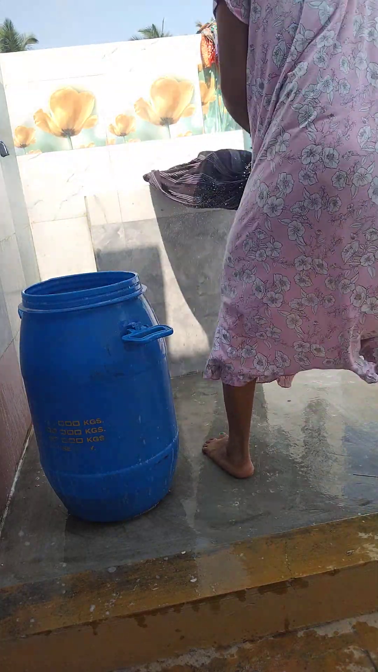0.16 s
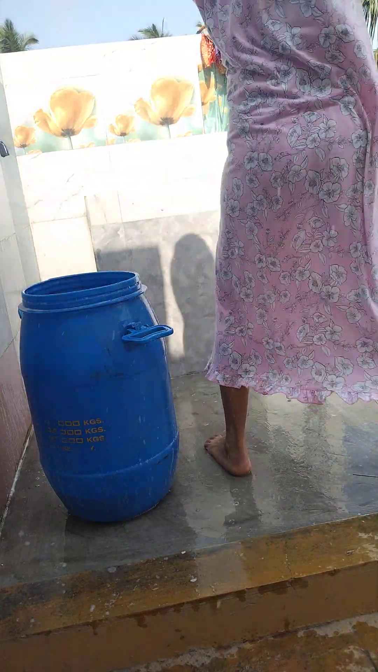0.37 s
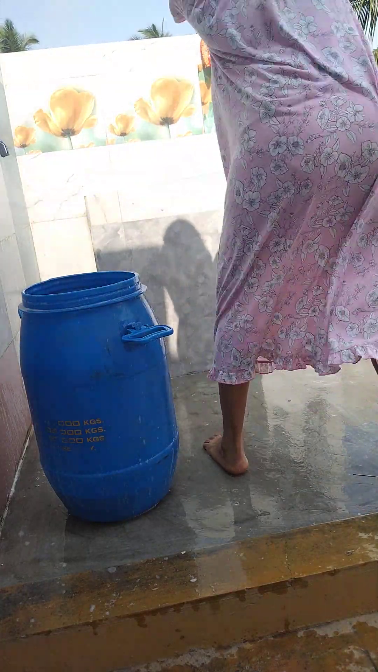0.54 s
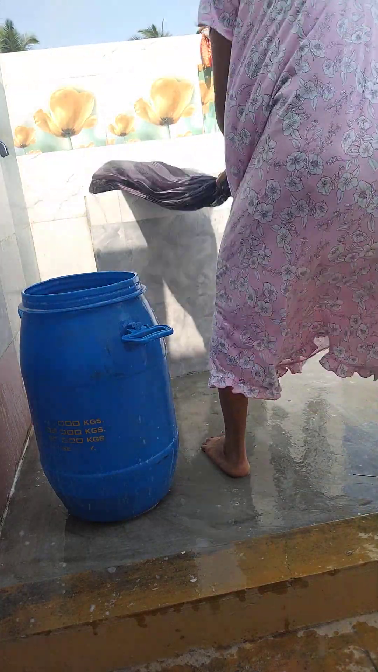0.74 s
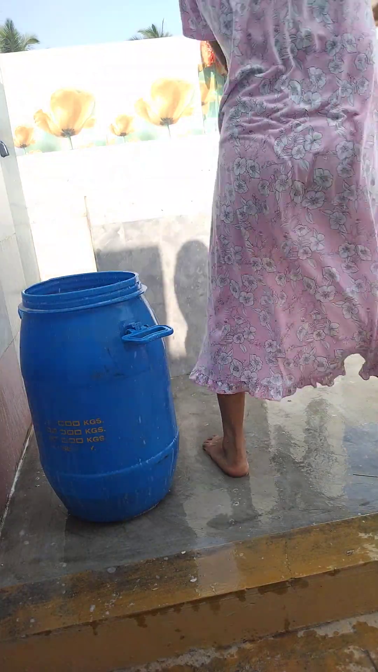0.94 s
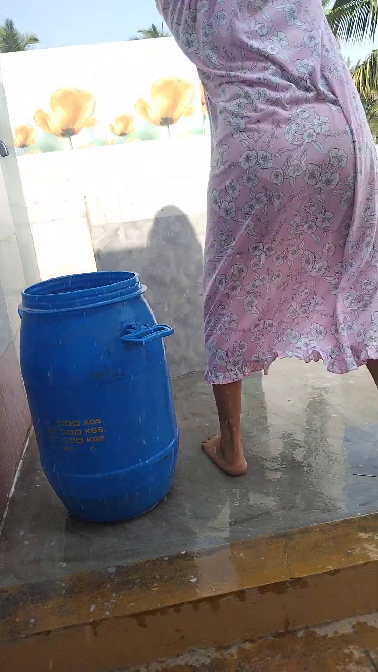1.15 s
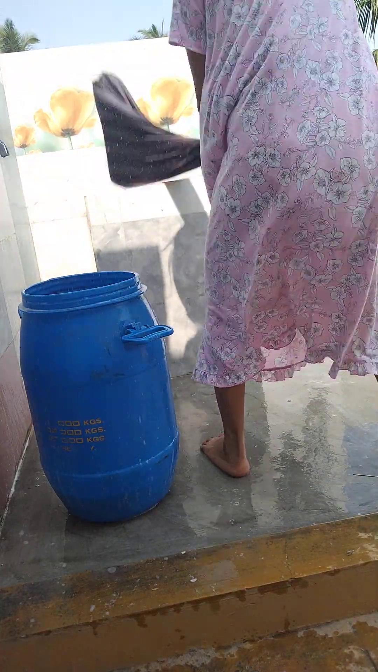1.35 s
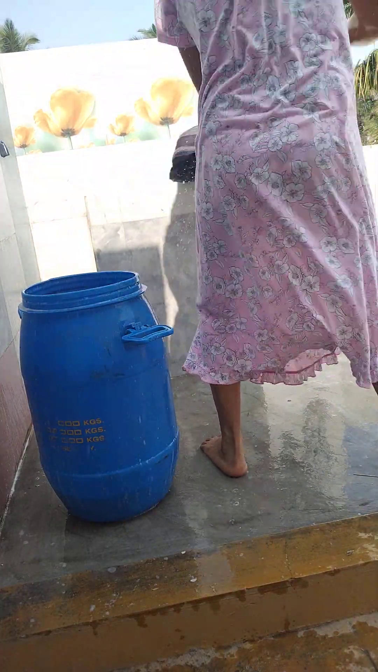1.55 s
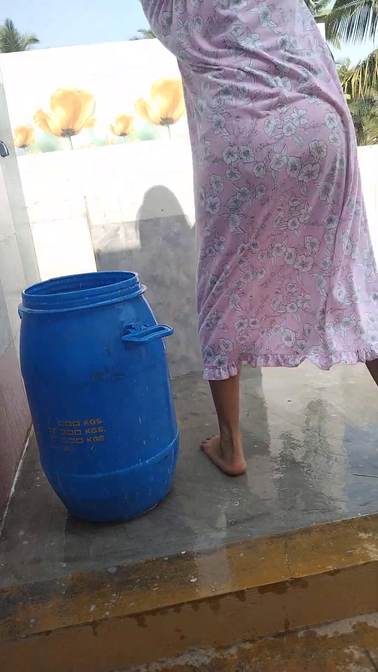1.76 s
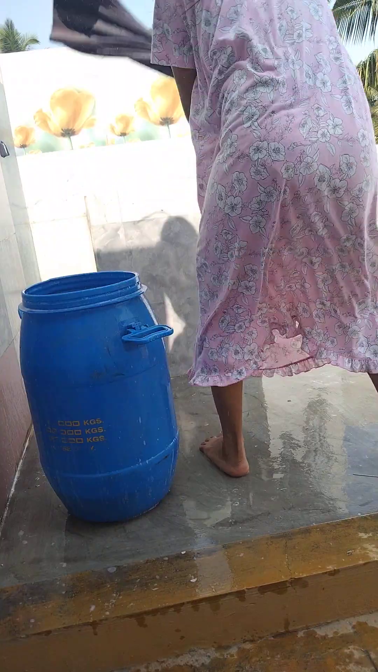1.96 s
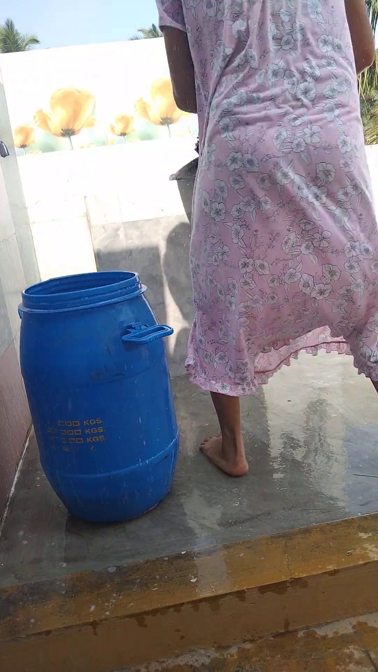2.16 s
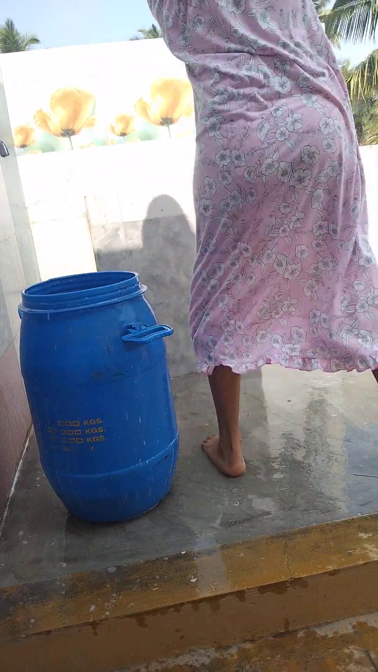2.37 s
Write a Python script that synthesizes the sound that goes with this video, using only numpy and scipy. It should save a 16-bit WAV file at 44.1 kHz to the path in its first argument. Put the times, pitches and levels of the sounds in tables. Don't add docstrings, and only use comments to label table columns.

```python
import sys
import numpy as np
from scipy import signal
from scipy.fft import rfft, irfft
from scipy.io import wavfile
from scipy.ndimage import uniform_filter1d, map_coordinates

SR = 44100
rng = np.random.default_rng(int(sys.argv[2]) if len(sys.argv) > 2 else 0)


def nominal_scale(level):
    x = np.asarray(level, float) / 20
    return 10 ** x


def materialize(psi):
    bounded = np.clip(np.atleast_2d(psi).T, -1, 1)
    quanta = np.round(bounded * 32767).astype(np.int16)
    wavfile.write(sys.argv[1], SR, quanta)


N = 110250


def unit(x):
    return x / np.sqrt(np.mean(x ** 2) + 1e-20)


def along(points, hz):
    point_hz, value = np.transpose(points)
    return np.interp(np.log(hz + 1), np.log(point_hz + 1), value)


def wobble(rate, size=N):
    knots = rng.standard_normal(int(size * rate / SR) + 4)
    return map_coordinates(knots, [np.arange(size) * rate / SR])


def noise(response, size=N):
    hz = np.fft.rfftfreq(size, 1 / SR)
    spectrum = rfft(rng.standard_normal(size))
    return unit(irfft(spectrum * response(hz), size))


def coloured(points):
    return lambda hz: nominal_scale(along(points, hz))


def hump(centre_hz, width):
    return lambda hz: np.exp(-(np.log((hz + 1) / centre_hz) / width) ** 2)


def add(track, s, sound):
    part = track[round(s * SR):][:len(sound)]
    part += sound[:len(part)]


def sine(hz, t, phase=0):
    return np.sin(2 * np.pi * hz * t + phase)


def gate(t, start_s, length_s):
    return np.clip(np.minimum(t - start_s + 0.0035, start_s + length_s - t) / 0.012, 0, 1)


# frequency in Hz, density in dB per Hz.
HUM_COLOUR = [(25, -40), (65, -11.5), (134, 12.5), (211, -6.5), (284, -39.5), (500, -19.5), (650, -41),
              (1100, -120)]


def hum():
    level_db = -53.5 + 2.3 * wobble(6.1)
    return nominal_scale(level_db) * noise(coloured(HUM_COLOUR))


# frequency in Hz, density in dB per Hz.
HISS_COLOUR = [(1500, -36.5), (3200, -9.5), (4100, 2), (5500, -1.5), (8000, -6.5), (11000, -10),
               (15500, -5), (16500, -30)]


def hiss():
    level_db = -73 + 1.1 * wobble(24) + 2.7 * wobble(85)
    return nominal_scale(level_db) * noise(coloured(HISS_COLOUR))


# time in seconds, level in dB.
DRAG_LEVEL = [(0, -59.5), (.125, -77.5), (.4, -53), (.58, -61.5), (.66, -84.5), (.8, -79), (.86, -58),
              (1.05, -45.5), (1.25, -63), (1.38, -65.5), (1.64, -54), (1.88, -53.5), (2.08, -57.5),
              (2.3, -48), (2.5, -49)]
# frequency in Hz, density in dB per Hz.
RUSTLE_COLOUR = [(120, -20), (200, -9), (306, -6), (434, -3), (784, -11), (1340, -10), (7740, -34.5),
                 (14800, -54.5)]


def dragging():
    t = np.arange(N) / SR
    level_db = np.interp(t, *np.transpose(DRAG_LEVEL)) + 3 + 0.5 * wobble(20.0)
    return nominal_scale(level_db) * noise(coloured(RUSTLE_COLOUR))


# start in seconds, centre in Hz, length in seconds, width share.
DRONE_BANDS = [(0, 1310, .15, .05), (.69, 1280, .05, .03), (.68, 410, .17, .28), (.66, 4100, .19, .03),
               (1.35, 1450, .06, .04), (1.40, 930, .05, .05), (1.40, 2250, .03, .04), (.805, 870, .04, .08),
               (.812, 1780, .025, .04), (.805, 2400, .02, .04), (.82, 1370, .03, .05)]
DRONE_LEVELS = [-67, -72, -56, -84, -62, -59.5, -59, -57.5, -74, -74, -60]


def drones():
    t, out = np.arange(N) / SR, np.zeros(N)
    for (s, hz, length_s, width), db in zip(DRONE_BANDS, DRONE_LEVELS):
        out += nominal_scale(db) * gate(t, s, length_s) * noise(hump(hz, width))
    return out


def puffs(rows, width, trim_db, rustle_db):
    out, t = np.zeros(N), np.arange(SR // 4) / SR
    for s, db, hz, length_s in rows:
        burst = noise(hump(hz, width), size=len(t))
        rustle = noise(coloured(RUSTLE_COLOUR), size=len(t))
        envelope = np.minimum(t / 0.0023, 1) * np.exp(-t / length_s)
        add(out, s - .002, nominal_scale(db + trim_db) * envelope * (burst + nominal_scale(rustle_db) * rustle))
    return out


# time in seconds, peak in dB, centre in Hz, length in seconds.
FLOP_EVENTS = [(0.137, -48, 700, 0.02), (0.146, -37.5, 514, 0.072), (0.808, -50, 473, 0.04),
               (1.166, -43, 930, 0.037), (1.257, -42.5, 283, 0.049), (1.403, -43.5, 426, 0.07),
               (1.845, -35, 436, 0.016), (2.018, -41, 440, 0.081), (2.05, -49, 494, 0.082)]


def flops():
    return puffs(FLOP_EVENTS, width=0.36, trim_db=-6, rustle_db=-4.5)


def swelling_tones(rows, trim_db):
    out, t = np.zeros(N), np.arange(SR // 5) / SR
    for s, db, hz, rise_s in rows:
        u = t / rise_s
        tone = sine(hz, t, 6 * rng.random() + 0.22 * wobble(90, size=len(t)))
        add(out, s, nominal_scale(db + trim_db) * np.e * u * np.exp(-u) * tone)
    return out


# time in seconds, level in dB, pitch in Hz, rise in seconds.
HOLLOW_ANSWERS = [(.232, -20.5, 120, 0.0092), (.246, -18, 490, .008), (.285, -28, 548, 0.018),
                  (0.284, -30, 340, 0.027), (0.41, -37, 510, .012), (.144, -39.5, 470, 0.0031),
                  (1.167, -44.5, 930, .003), (0.69, -51, 480, .005), (.94, -27, 215, 0.011),
                  (1.256, -43.5, 750, 0.0026)]


def answers():
    return swelling_tones(HOLLOW_ANSWERS, trim_db=0)


# time in seconds, peak in dB, centre in Hz, length in seconds.
DRIP_EVENTS = [(0.467, -47, 8450, 0.0048), (0.503, -52.5, 7830, 0.007), (0.657, -53.5, 7910, 0.0057),
               (0.657, -59.5, 12500, 0.008), (0.394, -48, 7600, 0.008), (0.502, -54, 12430, 0.01),
               (1.357, -57.5, 3990, 0.0051), (1.8, -42.5, 2540, 0.014), (1.848, -42, 2600, 0.01),
               (0.147, -47, 3300, 0.011), (1.167, -46, 4600, 0.0091), (1.801, -48.5, 7000, 0.0078),
               (1.964, -46.5, 3860, 0.018), (1.9923, -38, 5800, 0.0054)]


def drips():
    return puffs(DRIP_EVENTS, width=0.3, trim_db=-8, rustle_db=-4.5)


def wet_contact(t, contact_s, attack_s, colour):
    press = np.minimum(t / attack_s, 1) ** 2 * np.exp(-np.maximum(t - contact_s, 0) / 0.017)
    body = noise(coloured(colour), size=len(t)) * nominal_scale(3 * wobble(235.6, size=len(t)))
    split_hz = 1180
    bass = signal.sosfilt(signal.butter(2, split_hz, fs=SR, output="sos"), body)
    treble = signal.sosfilt(signal.butter(2, split_hz, "high", fs=SR, output="sos"), body)
    sizzle = np.minimum(1.5 * t / attack_s, 1) * np.exp(-t / 0.018)
    return nominal_scale(-6) * press * bass + 3.2 * sizzle * treble


def slab_ring(t, modes):
    out = np.zeros(len(t))
    for hz, level_db, t60_s in modes:
        phase = 6 * rng.random() + 0.87 * wobble(70, size=len(t))
        out += nominal_scale(level_db - 60 * t / min(t60_s, 0.22)) * sine(hz, t, phase)
    return np.minimum(t / 0.019, 1) * out


# frequency in Hz, time to fall 60 dB in seconds.
YARD_T60 = [(100, 0.9), (500, 0.43), (2000, 0.63), (8000, 0.33), (16000, 0.96)]
# frequency in Hz, density in dB per Hz.
WALL_COLOUR = [(35, -76.5), (60, -28.5), (161, -18), (199, -19), (546, -14.5), (586, -14), (7960, -43.5),
               (15000, -70)]


def yard(t, far_db):
    hz, u, z = signal.stft(noise(coloured(WALL_COLOUR), size=len(t)), SR, nperseg=256)
    swell_db = far_db * np.exp(-((u - 0.11) / 0.055) ** 2) / (1 + hz[:, None] / 5000)
    decay_db = 60 * u / along(YARD_T60, hz)[:, None]
    tail = signal.istft(z * nominal_scale(swell_db - decay_db), SR, nperseg=256)[1][:len(t)]
    splashes = nominal_scale(1.3 * wobble(160, size=len(t)))
    return tail * np.minimum(t / 0.0096, 1) * splashes


def barrel(t, hold_s):
    envelope = np.minimum(t / 0.013, 1) * np.exp(-(np.maximum(t - hold_s, 0) / 0.105) ** 2)
    return envelope * sine(165, t, 0.054 * wobble(42, size=len(t)))


def trough(t, level_db):
    envelope = np.minimum(t / 0.01, 1) * nominal_scale(level_db - 60 * t / 0.56)
    return envelope * sine(122, t, 0.5 * wobble(24, size=len(t)))


SLAP_TIMES = [.2050, .8478, 1.4772, 2.1182]
# peak in dB, contact in seconds, attack in seconds, yard level in dB, far wall swell in dB.
SLAP_BLOWS = [
    (-0.5, 0.034, 0.0053, -7.5, 4.5),
    (-6, 0.0075, 0.01, -3.5, 8),
    (-8.5, 0.049, 0.011, -1, 3.5),
    (-4, 0.024, 0.013, -4, 4.5),
]
# frequency in Hz, density in dB per Hz.
WET_COLOURS = [
    [(35, -58), (60, -14.5), (559, 0.5), (1080, -34), (1330, -11.5), (1900, -26.5), (2040, -19.5),
     (14700, -55)],
    [(35, -54), (60, -44), (224, 0.5), (834, -6), (1010, -13), (1210, -8), (4030, -31), (15000, -61)],
    [(35, -43), (60, -5), (691, -3), (834, 14), (1010, -5), (2140, -4), (2350, -5.5), (14700, -36)],
    [(35, -43), (60, -21), (432, 10), (834, 4.5), (1060, -4), (1370, -2), (2770, -12), (15000, -42.5)],
]
# frequency in Hz, level in dB, time to fall 60 dB in seconds.
SLAB_MODES = [
    [(255.3, 5, .3), (526, 8, 0.15), (845, 4.5, 0.2), (1293, -10, 0.082), (2050, -7, 0.068)],
    [(239, 4, 0.28), (618, 1.5, 0.29), (1250, 4, 0.13)],
    [(609, 1, 0.21), (840, 1, 0.13), (1330, 5, 0.24), (2160, -3, 0.082)],
    [(444, -2, 0.12), (817, -0.5, 0.15), (1390, -6, 0.065)],
]
SLAB_LEVELS = [2.5, 0.5, 1.5, -2.5]
# level over the slap in dB, time from the blow until it starts to fade in
# seconds.
BARREL_BOOMS = [
    (-20.5, 0.028),
    (-18, 0.1),
    (-1, 0.048),
    (-10.5, 0.083),
]
TROUGH_LEVELS = [-16, -18.5, -19, -39]


def slaps():
    out, t = np.zeros(N), np.arange(SR) / SR
    rows = zip(SLAP_TIMES, SLAP_BLOWS, WET_COLOURS, SLAB_MODES, SLAB_LEVELS, BARREL_BOOMS, TROUGH_LEVELS)
    for s, blow, colour, modes, ring_db, (barrel_db, hold_s), trough_db in rows:
        peak_db, contact_s, attack_s, yard_db, far_db = blow
        sound = wet_contact(t, contact_s, attack_s, colour)
        sound += nominal_scale(ring_db - 6) * slab_ring(t, modes)
        sound += nominal_scale(yard_db) * yard(t, far_db)
        sound += nominal_scale(barrel_db) * barrel(t, hold_s)
        sound += 2 * trough(t, trough_db)
        add(out, s, nominal_scale(peak_db - 12.5) * sound)
    return out


FOLD_TIMES = [.2056, .2100, .2138, .8561, 1.4800, 1.4853, 2.1218, 2.1256]
# pop level in dB, pop length in seconds, spray level in dB.
FOLD_POPS = [(-24.5, 0.0002, -24), (-7.5, 0.00029, -24), (-5.5, 0.0004, -27.5), (-3, 0.00013, -29.5),
             (-30, 0.00012, -22), (-7.5, 0.00035, -30), (-27, 0.00017, -29.5), (-13, 0.00035, -30)]


def folds():
    out, t = np.zeros(N), np.arange(SR // 10) / SR

    def spray_colour(hz):
        return 1 / (1 + (2790 / (hz + 1)) ** 4) / (1 + hz / 6000)

    for s, (pop_db, pop_s, spray_db) in zip(FOLD_TIMES, FOLD_POPS):
        u = t / pop_s
        pop = 1.3 * u ** 2 * (3 - u) * np.exp(-u)
        spray = noise(spray_colour, size=len(t)) * np.exp(-t / 0.0024)
        add(out, s, nominal_scale(pop_db) * pop + nominal_scale(spray_db) * spray)
    return out


# time in seconds, level in dB, pitch in Hz, rise in
# seconds.
FOLD_RINGS = [(0.2056, -30, 2460, 0.0031), (0.2078, -15.5, 2092, 0.0019), (0.2094, -16, 1260, 0.0023),
              (0.2133, -8.5, 465, 0.0026), (0.2135, -28, 3350, 0.0022), (0.2146, -18, 1350, 0.0027),
              (0.2185, -29, 2320, 0.0015), (0.2217, -12, 291, 0.0017), (0.2282, -8, 552, 0.0019),
              (0.2423, -11, 193, 0.0016), (0.257, -18.5, 516, 0.0021), (0.854, -27.5, 2530, 0.0018),
              (0.8545, -27, 3270, 0.0013), (0.8551, -28.5, 2930, 0.0012), (0.8554, -16.5, 744, 0.0015),
              (0.8558, -18.5, 348, 0.001), (0.8572, -18.5, 1177, 0.0016), (0.8581, -24.5, 2050, 0.0021),
              (0.861, -18.5, 257, 0.0019), (0.8667, -18.5, 620, 0.0013), (0.8669, -23.5, 285, 0.0033),
              (0.898, -21, 590, 0.0018), (1.4835, -21, 1710, 0.002), (1.4839, -13.5, 285, 0.0016),
              (1.4844, -21.5, 2136, 0.0021), (1.4869, -16.5, 839, 0.0024), (1.4885, -23.5, 1220, 0.0019),
              (1.4912, -16, 202, 0.0016), (1.4984, -16.5, 800, 0.0024), (1.5061, -23, 910, 0.0023),
              (1.5066, -17.5, 191, 0.0016), (1.5125, -15.5, 233, 0.0012), (1.5173, -23, 630, 0.002),
              (2.1208, -23, 1570, 0.0016), (2.1231, -31, 2540, 0.002), (2.1242, -13.5, 779, 0.0025),
              (2.1256, -21, 1240, 0.0023), (2.126, -9, 432, 0.0014), (2.1308, -13, 742, 0.0014),
              (2.1399, -17.5, 1363, 0.0024), (2.1403, -24, 732, 0.002), (2.1431, -17, 470, 0.0022),
              (2.1462, -21.5, 925, 0.0018), (2.1673, -19.5, 520, 0.0012)]


def fold_rings():
    return swelling_tones(FOLD_RINGS, trim_db=3)


# time in seconds, level in dB, half length in seconds.
LOOSE_END = [
    (0.524, -53, 0.026),
    (2.397, -36, 0.015),
    (2.235, -39.5, 0.015),
]


def swish():
    t = np.arange(N) / SR
    envelope = sum(nominal_scale(db) * np.exp(-((t - s) / half_s) ** 2) for s, db, half_s in LOOSE_END)
    return envelope * noise(lambda hz: coloured(WALL_COLOUR)(hz) * (hz / 1000) ** 0.21)


# time in seconds, pitch in Hz, level in dB.
BIRD_CALL = [
    (1.385, 7200, -76),
    (1.41, 6600, -73),
    (1.435, 6350, -72),
    (1.46, 6500, -76),
]


def bird():
    t = np.arange(N) / SR
    s, hz, db = np.transpose(BIRD_CALL)
    whistle = np.sin(2 * np.pi * np.cumsum(np.interp(t, s, hz)) / SR)
    return gate(t, s[0], s[-1] - s[0]) * nominal_scale(np.interp(t, s, db)) * whistle


# time in seconds, pitch in Hz, level in dB.
FLOP_KNOCKS = [
    (1.844, 450, -37),
    (2.022, 450, -32),
]


def knocks():
    out, t = np.zeros(N), np.arange(SR // 10) / SR
    u = t / 0.0033
    for s, hz, db in FLOP_KNOCKS:
        add(out, s, nominal_scale(db) * np.e * u * np.exp(-u) * sine(hz, t))
    return out


def scene():
    still = hum() + hiss() + drones() + bird()
    cloth = dragging() + flops() + swish()
    water = drips() + knocks()
    blows = slaps() + folds() + fold_rings() + answers()
    return (still + cloth + water + blows)[None]


def roll_off(x):
    return signal.sosfilt(signal.butter(12, 16650, fs=SR, output="sos"), x)


# frequency in Hz, gain in dB.
MIC_COLOUR = [(30, -30.5), (68, 1.5), (120, 0.5), (5500, -3), (7800, 5.5), (10000, -0.5), (15600, 4.5),
              (16300, -28.5)]
# frequency in Hz, level in dB.
SUPPRESSED_NOISE = [(200, -130), (600, -83), (3000, -97), (16000, -120)]


def record(dry):
    limited = dry / (1 + np.abs(dry / 0.8) ** 4) ** (1 / 4)
    hz, _, z = signal.stft(limited, SR, nperseg=1024, noverlap=768)
    power = uniform_filter1d(np.abs(z) ** 2, size=7, axis=2)
    power = np.abs(uniform_filter1d(power, size=3, axis=1)) + 1e-20
    noise_power = nominal_scale(along(SUPPRESSED_NOISE, hz))[:, None] ** 2
    keep = np.maximum(1 - noise_power / power, nominal_scale(-14))
    mic = nominal_scale(along(MIC_COLOUR, hz))[:, None]
    heard = signal.istft(z * keep * mic, SR, nperseg=1024, noverlap=768)[1][:, :N]
    return roll_off(heard)


dry = scene()
out = record(dry)
materialize(out)
```